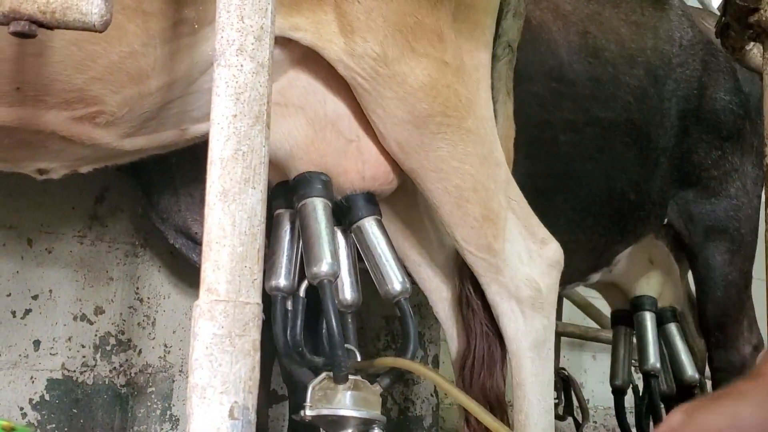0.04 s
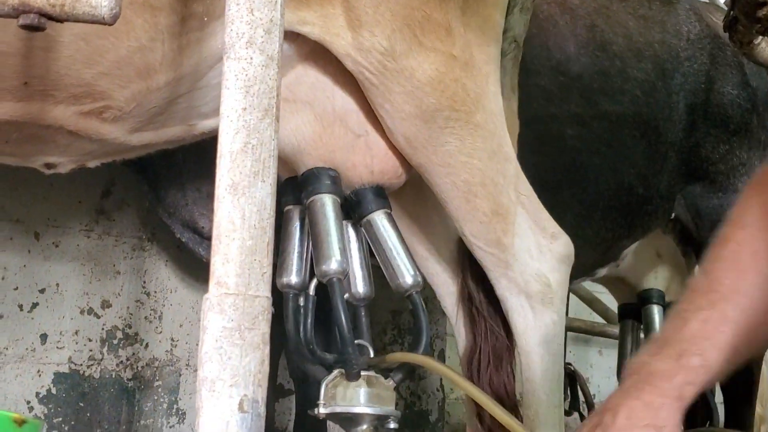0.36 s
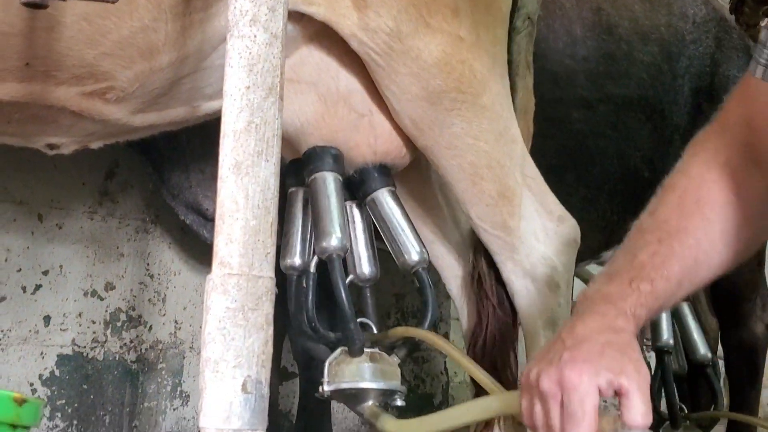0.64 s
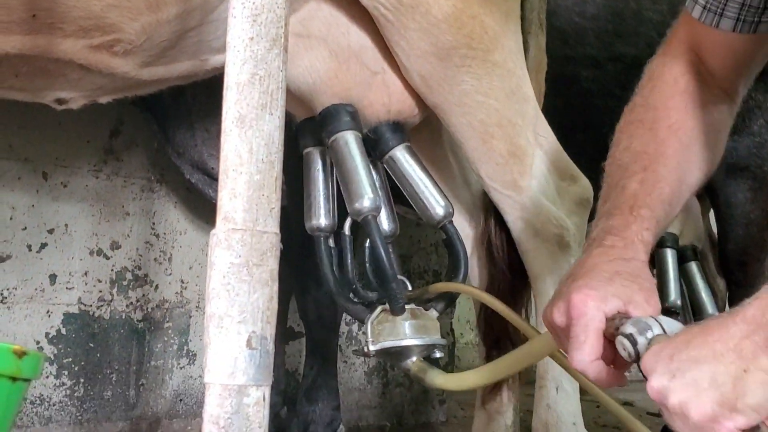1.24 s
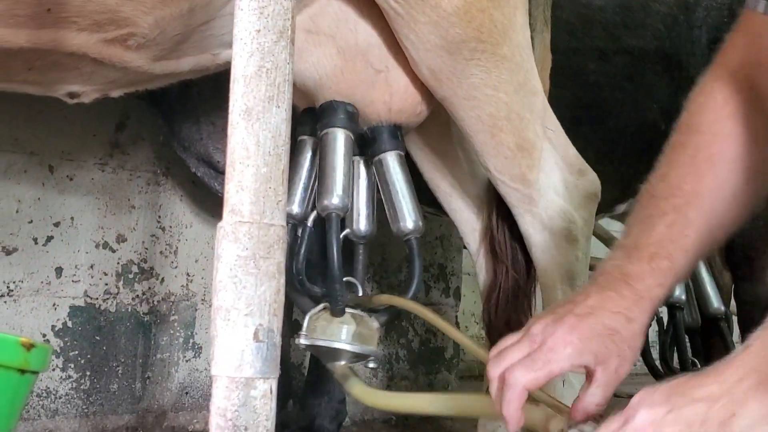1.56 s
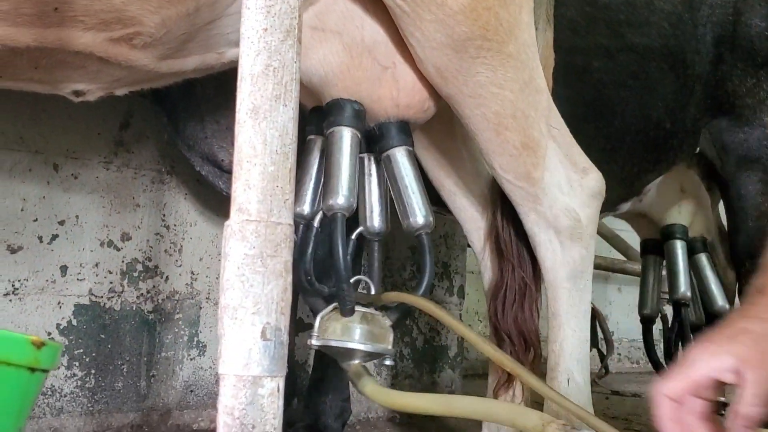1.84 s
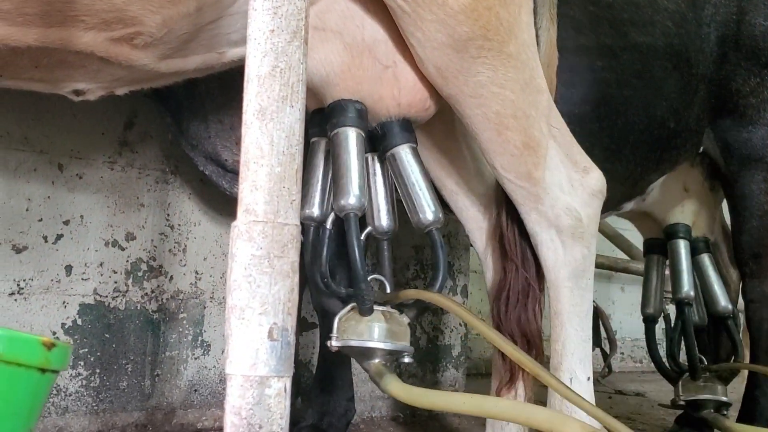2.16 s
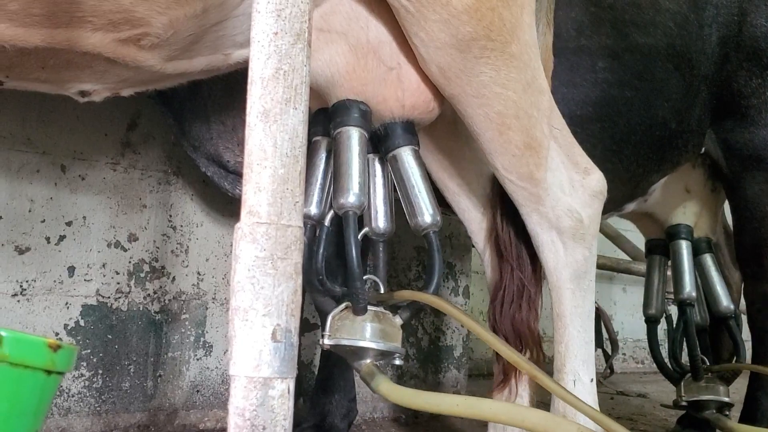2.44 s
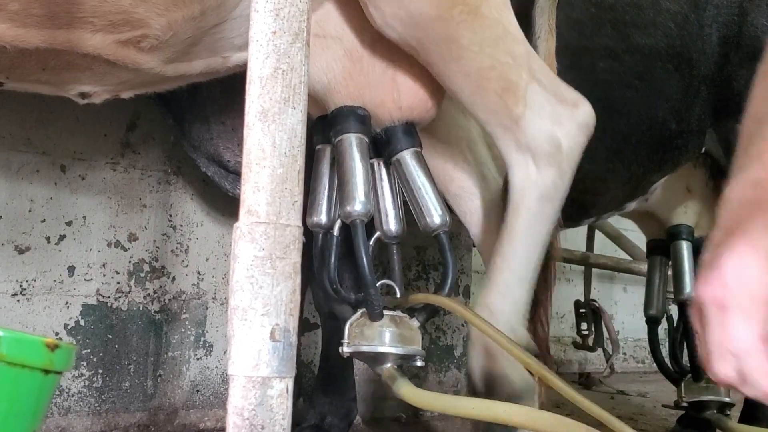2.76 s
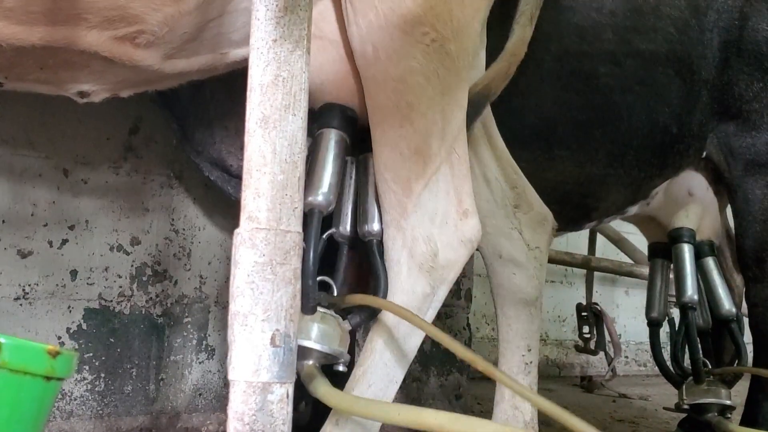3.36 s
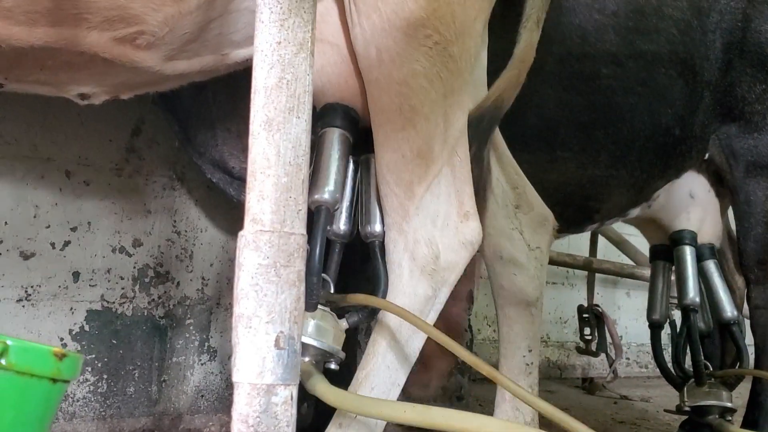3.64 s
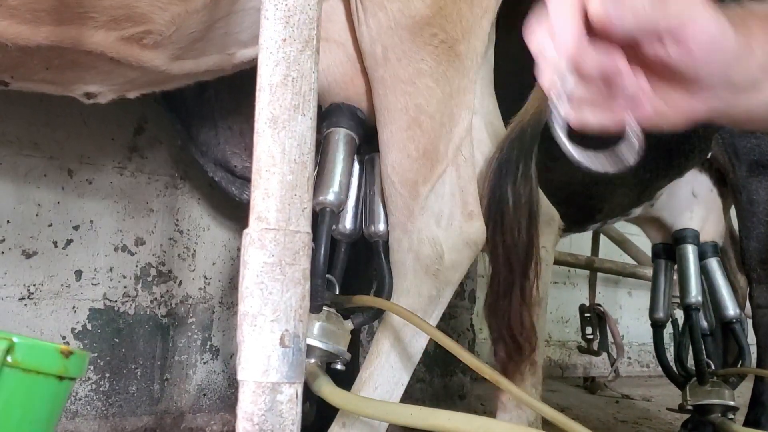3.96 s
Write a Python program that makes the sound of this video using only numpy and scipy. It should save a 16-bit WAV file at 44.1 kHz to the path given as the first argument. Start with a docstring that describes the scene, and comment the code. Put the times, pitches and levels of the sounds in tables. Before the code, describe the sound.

Close beside a cow in a barn, a milking machine's vacuum pump drones while valves tick and let in short puffs of air. Toward the end, hair brushes the hoses and the steel cluster bumps, ringing briefly.

```python
"""In a barn, close beside a cow on the milking machine, on a stereo pair of microphones.
A four-vane vacuum pump drones behind the wall, and air hisses as it is drawn in at the cluster.
Nearby, pulsator valves click and let in short puffs of air. The cow's hair brushes the hoses, most
of all late on, when she steps: the steel claw knocks and rings, and her tail swishes twice."""
import sys
import numpy as np
from scipy import signal
from scipy.fft import rfft, irfft
from scipy.io import wavfile

SR = 44100
rng = np.random.default_rng(int(sys.argv[2]) if len(sys.argv) > 2 else 0)


def waveform_to_disk(signal):
    """Save audio, clipped to [-1, 1], as 16-bit WAV at the path in sys.argv[1]."""
    frames = np.transpose(np.atleast_2d(signal))
    scaled = np.clip(frames, -1, 1) * 32767
    samples = np.round(scaled).astype(np.int16)
    wavfile.write(sys.argv[1], SR, samples)


N = 176400
T = np.arange(N) / SR
FREQS = np.fft.rfftfreq(N, 1 / SR)
VANES = 4
LEFT_RIGHT = np.array([[1], [-1]])

# Pump speed. Each row: time in seconds, shaft turns per second.
SHAFT_SPEED = [(0, 14.579), (1.2, 14.578), (2.2, 14.571), (3.1, 14.563), (4, 14.561)]
# The pump's strong tones. Each row: multiple of the shaft rate, level in dB, left minus right in dB.
PUMP_TONES = [(2, -53, 8), (3, -47, 7), (4, -32.5, 0.5), (6, -55.5, -6), (7, -53.5, -19), (8, -31, 0),
              (9, -54.5, 13), (10, -58, -4), (11, -57.5, -1), (12, -54, -3), (15, -48, -3), (16, -51.5, 1),
              (20, -52.5, 0), (24, -40, 0.5), (28, -59.5, -20), (31, -61.5, 12), (32, -45.5, -5.5),
              (33, -63, 9), (34, -52.5, 12), (36, -51.5, -7), (40, -54, 0), (44, -54.5, -19),
              (48, -56, -6.5), (49, -61.5, -3), (53, -59, 0), (56, -54, -6), (70.94, -56.5, 6)]
# Outline of the weak tones between them. Each row: frequency in Hz, level in dB.
PUMP_CLATTER = [(30, -54), (70, -69.5), (150, -66.5), (200, -67), (330, -64.5), (470, -66.5), (750, -65),
                (1100, -67.5), (2000, -71.5)]
# Air drawn in at the cluster. Each row: frequency in Hz, left and right density in dB per Hz.
LEAK_SPECTRUM = [(1010, -85.5, -94), (2500, -78.5, -85), (4670, -77.5, -78.5), (5800, -76, -84.5),
                 (7180, -73, -80), (8500, -89.5, -88), (10500, -90, -85.5), (11600, -87, -88),
                 (12300, -81, -82.5), (14000, -84.5, -85.5), (15600, -89, -85)]
# Slow drift of that hiss. Each row: time in seconds, gain in dB.
LEAK_DRIFT = [(0, 0), (.5, -0.5), (1.1, -0.4), (1.3, 0.1), (1.9, -.5), (2.4, 1.5), (2.6, 0.5), (2.85, 1.5),
              (3.3, 1.5), (4, 0.5)]
# Pulsator strokes. Each row: start in seconds, click level in dB, ping pitch in Hz, ping level in dB,
# puff level in dB, puff decay in seconds.
VALVE_STROKES = [(-.03, -40, 13000, -45, -34, 0.086), (.072, -29, 13100, -33.5, -38, 0.079),
                 (.634, -41, 12500, -39, -37, 0.15), (.717, -31, 10500, -33, -35, 0.042),
                 (.815, -27.5, 12500, -26.5, -36.5, .06), (1.393, -34, 11000, -34, -36, 0.12),
                 (1.45, -29, 6030, -25.5, -36, 0.099), (1.591, -26.5, 6700, -27.5, -37, 0.06),
                 (2.026, -30, 12500, -38, -38, .09), (2.215, -32, 10400, -33.5, -33, 0.057),
                 (2.301, -28, 12800, -31, -37, 0.053), (2.756, -33, 13000, -34, -35, 0.065),
                 (2.925, -31, 6500, -31, -36, .06), (3.045, -28.5, 13100, -27, -47, .05),
                 (3.667, -34, 7000, -38, -37, .07), (3.730, -29, 12500, -27, -39, .05)]
# Colours of the valve click and the air puff. Each row: frequency in Hz, relative level in dB.
CLICK_SPECTRUM = [(1000, -24), (2500, 0), (4500, -1), (6800, 1), (8500, -1), (11000, -11), (12600, -4),
                  (14000, -1), (16000, -6)]
PUFF_SPECTRUM = [(600, -12), (1500, -7), (3000, 0), (5000, 0.5), (7100, 3), (8500, -8.5), (11000, -12.5),
                 (12500, -4.5), (16000, -12)]
# Resonances of the air passages. Each row: centre in Hz, width in Hz, left and right gain in dB.
PASSAGE_RESONANCES = [(1980, 74, 10.5, 1), (2720, 150, 0.5, 9), (3700, 150, 2.5, 4.5), (4700, 110, 4, 1),
                      (4950, 88, 2.5, -1), (7170, 190, 0, -2), (9050, 140, 1, 0)]
# Hair brushing past. Each row: peak time, rise and fall in seconds, body and hiss level in dB.
BRUSH_SWELLS = [(.92, .02, .03, -46, -47), (1.24, 0.046, .08, -56, -49.5), (2.58, .08, .13, -48, -42.5),
                (3.04, 0.032, .04, -34, -31.5), (3.22, 0.041, 0.062, -41, -39),
                (3.45, 0.053, .05, -37, -40.5), (3.525, 0.075, 0.074, -42, -33.5),
                (3.745, 0.074, .10, -39, -31.5), (3.99, 0.068, .05, -45, -42)]
# Colours of the brushing's body and bright hiss. Each row: frequency in Hz, relative level in dB.
BRUSH_BODY_SPECTRUM = [(1000, -24), (3000, -7), (5000, -3), (7200, 2), (9000, -13), (12000, -22),
                       (16000, -23)]
BRUSH_HISS_SPECTRUM = [(3000, -16), (6000, -12), (8200, -2), (10800, -3.5), (12200, 1.5), (13200, -2.5),
                       (14500, -2), (16000, -3)]
# Knocks of claw and hoses as the cow shifts. Each row: start in seconds, thud and ring level in dB.
CLAW_KNOCKS = [(2.195, -35.5, -54), (3.219, -30, -49), (3.254, -34.5, -37), (3.281, -46, -40)]
# Colour of the thud. Each row: frequency in Hz, relative level in dB.
THUD_SPECTRUM = [(60, -14), (240, 2), (500, -7), (850, 2), (1150, -6), (1500, -6), (2500, -7.5),
                 (5000, -23), (12000, -30)]
# Modes of the steel claw. Each row: frequency in Hz, relative level in dB, seconds to fall 60 dB.
CLAW_MODES = [(2325, -1.5, 0.18), (2260, 2, .15), (2820, -12, 0.18), (4027, 0, 0.14)]
# The barn's steady rumble. Each row: frequency in Hz, density in dB per Hz.
RUMBLE_SPECTRUM = [(20, -83), (40, -69), (60, -60), (85, -70), (122, -61.5), (190, -76.5), (350, -70),
                   (560, -74), (800, -76.5), (1300, -77.5), (1650, -79.5), (2000, -77), (3000, -78.5),
                   (5000, -86.5), (16000, -103)]


def shaft_angle(vane_opens_s=2.012):
    """Angle of the pump shaft in radians, zero as one vane opens."""
    turns = np.cumsum(np.interp(T, *np.array(SHAFT_SPEED).T)) / SR
    return 2 * np.pi * (turns - np.interp(vane_opens_s, T, turns))


def vacuum_pump(angle, scatter_hz=200, diffuse_hz=970, half_order_db=-3.5, waver_rad=.00225):
    """Pressure repeats every two turns; walls scramble the higher tones differently at each microphone."""
    count, size = 280, 16384  # tones and samples in one cycle
    order = np.arange(count) / 2
    hz = order * SHAFT_SPEED[0][1]
    side_draw, phase_draw, spread_draw = rng.standard_normal((count, 3)).T
    level_db = spectrum_db(PUMP_CLATTER, hz) + half_order_db * (np.arange(count) % 2)
    apart = np.minimum(hz / diffuse_hz, 1) ** 2
    side_db = 6 * apart * side_draw
    for multiple, tone_db, tone_side_db in PUMP_TONES:
        k = 2 * round(multiple)
        level_db[k], side_db[k] = tone_db, tone_side_db
    gain = pan(side_db) * undb(level_db) * (order >= 2)
    phase = (hz / scatter_hz) ** 2 * phase_draw + LEFT_RIGHT * apart * spread_draw
    cycle = irfft(gain * np.exp(1j * phase), size) * size / np.sqrt(2)
    position = (angle + waver_rad * wander(5)) / (4 * np.pi) % 1
    return np.array([np.interp(position, np.arange(size) / size, channel) for channel in cycle])


def cluster_leak(flicker_db=.37):
    """Air drawn into the vacuum hisses steadily."""
    density_db = np.array([spectrum_db(LEAK_SPECTRUM, FREQS, column) for column in (1, 2)])
    hiss = equalise(white(), density_db) * np.sqrt(SR / 2)
    drift_db = np.interp(T, *np.array(LEAK_DRIFT).T)
    return hiss * undb(drift_db + flicker_db * wander(14))


def pulsators(click_rise_s=.00089, ping_width_hz=900, flutter_db=1.3):
    """Each valve stroke clicks, pings and lets in a puff that dies as the pressure evens out."""
    excitation = rfft(white())
    pings = click_power = puff_power = 0
    for start, click_db, ping_hz, ping_db, puff_db, puff_decay_s in VALVE_STROKES:
        ping = irfft(excitation / (1 + 2j * (FREQS - ping_hz) / ping_width_hz), N)
        pings += ping / ping.std() * undb(ping_db) * burst(start, click_rise_s, decay_s=.0023)
        click_power += (undb(click_db) * burst(start, click_rise_s, decay_s=.0026)) ** 2
        puff_power += (undb(puff_db) * burst(start, rise_s=.0069, decay_s=puff_decay_s)) ** 2
    puffs = noise(PUFF_SPECTRUM) * np.sqrt(puff_power) * undb(flutter_db * wander(67))
    clicks = noise(CLICK_SPECTRUM) * np.sqrt(click_power)
    return clicks + pings * pan(4) + puffs * pan(4.5)


def air_passages(x):
    """Narrow air passages ring at their own pitches."""
    gain_db = 0
    for hz, width_hz, left_db, right_db in PASSAGE_RESONANCES:
        gain_db += np.array([[left_db], [right_db]]) / (1 + (2 * (FREQS - hz) / width_hz) ** 2)
    return equalise(x, gain_db)


def hair_brushing(grain_db=2, patchy_db=.76):
    """Leg and tail hair slide over the hoses close by: swells of fine, dense grains."""
    body_power = hiss_power = 0
    for peak, rise, fall, body_db, hiss_db in BRUSH_SWELLS:
        swell = np.exp(-((T - peak) / np.where(T < peak, rise, fall)) ** 2)
        body_power += swell * undb(body_db) ** 2
        hiss_power += swell * undb(hiss_db) ** 2
    grains = undb(grain_db * wander(1200) + patchy_db * wander(50))
    grains /= np.sqrt(np.mean(grains ** 2))
    body = noise(BRUSH_BODY_SPECTRUM) * np.sqrt(body_power) * pan(5)
    hiss = noise(BRUSH_HISS_SPECTRUM) * np.sqrt(hiss_power)
    return grains * (body + hiss)


def claw_knocks(rise_s=.0028):
    """Dull bumps, a little to the left, set the steel claw ringing briefly."""
    thud = noise(THUD_SPECTRUM)
    knocks = 0
    for start, thud_db, ring_db in CLAW_KNOCKS:
        knocks += thud * undb(thud_db) * burst(start, rise_s, decay_s=.019)
        for hz, mode_db, t60 in CLAW_MODES:
            ring = np.sin(2 * np.pi * (hz * (T - start) + rng.random((2, 1))))
            knocks += ring * undb(ring_db + mode_db) * burst(start, rise_s, t60 / np.log(1000))
    return knocks * pan(3)


def barn_rumble(angle, throb_depth=.084, alike_below_hz=650):
    """Machine rumble, alike at both microphones in the bass, throbs with the shaft and its vanes."""
    mid, side = rfft(white()) * undb(spectrum_db(RUMBLE_SPECTRUM, FREQS)) * np.sqrt(SR / 2)
    alike = 1 / (1 + (FREQS / alike_below_hz) ** 3)
    rumble = irfft(mid * np.sqrt(1 + alike) + LEFT_RIGHT * side * np.sqrt(1 - alike), N) / np.sqrt(2)
    throb = (np.cos(angle) + np.cos(VANES * angle)) / 2
    return rumble * (1 + throb_depth * throb)


def upper_fade(x, above_hz=230, db_per_s=.4):
    """The drone's upper range slowly weakens while its bass holds."""
    bass = irfft(rfft(x) / (1 + (FREQS / above_hz) ** 6), N)
    return bass + (x - bass) * undb(-db_per_s * (T - T.mean()))


def stall_reflections(x, ripple_db=1.4, points=400):
    """Reflections off the wall and posts ripple the spectrum differently at each microphone."""
    hz = np.linspace(0, SR / 2, points)
    ripple = np.array([np.interp(FREQS, hz, row) for row in rng.standard_normal((2, points))])
    return equalise(x, ripple_db * ripple)


def barn_echo(x, t60_s=.25, echo_db=-9.5):
    """The barn adds a short, diffuse tail to the direct sound."""
    tail = (white() * burst(start=.0029, rise_s=.008, decay_s=t60_s / np.log(1000)))[:, :N // 4]
    tail /= np.sqrt(np.sum(tail ** 2, axis=1, keepdims=True))
    return x + undb(echo_db) * signal.fftconvolve(x, tail, axes=1)[:, :N]


def undb(db):
    """Decibels to gain."""
    return 10 ** (np.asarray(db) / 20)


def spectrum_db(table, hz, column=1):
    """A table's levels, interpolated along log frequency."""
    table = np.array(table)
    return np.interp(np.log(np.maximum(hz, 1)), np.log(table[:, 0]), table[:, column])


def equalise(x, db):
    """Apply a gain at each frequency."""
    return irfft(rfft(x) * undb(db), N)


def white():
    """Unrelated white noise left and right."""
    return rng.standard_normal((2, N))


def noise(table):
    """Stereo noise of a given colour, rms 1."""
    coloured = equalise(white(), spectrum_db(table, FREQS))
    return coloured / coloured.std()


def wander(rate_hz):
    """Random motion below about rate_hz, with spread 1."""
    motion = irfft(rfft(rng.standard_normal(N)) / (1 + (FREQS / rate_hz) ** 4), N)
    return motion / motion.std()


def pan(left_minus_right_db):
    """Left and right gains at constant power."""
    gains = undb(LEFT_RIGHT * left_minus_right_db / 2)
    return gains / np.sqrt(np.mean(gains ** 2, axis=0))


def burst(start, rise_s, decay_s):
    """Straight attack, exponential release."""
    age = T - start
    return np.clip(age / rise_s, 0, 1) * np.exp(-np.maximum(age - rise_s, 0) / decay_s)


def scene():
    """The pump behind the wall; hiss, valves and cow close to the microphones."""
    angle = shaft_angle()
    drone = upper_fade(vacuum_pump(angle) + barn_rumble(angle))
    air = air_passages(cluster_leak() + barn_echo(pulsators()))
    return drone + stall_reflections(air + hair_brushing()) + barn_echo(claw_knocks())


def record(dry):
    """The recorder cuts the top steeply."""
    top_hz = 15850
    return signal.sosfilt(signal.ellip(12, .1, 80, top_hz, fs=SR, output="sos"), dry)


dry = scene()
out = record(dry)
waveform_to_disk(out)
```